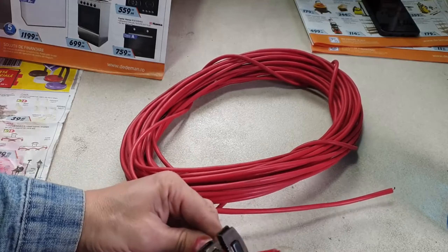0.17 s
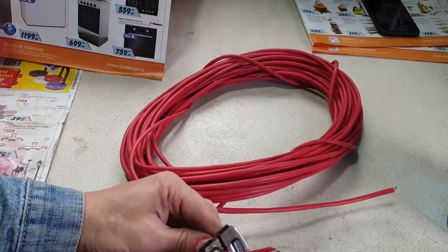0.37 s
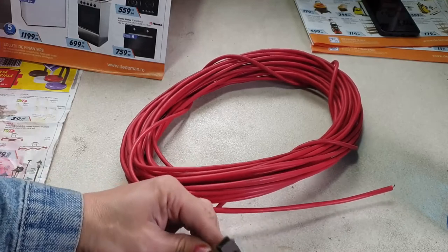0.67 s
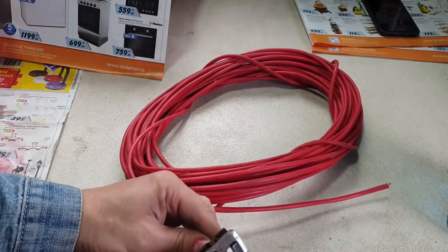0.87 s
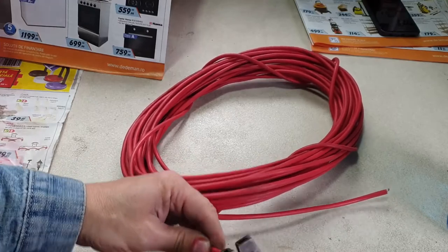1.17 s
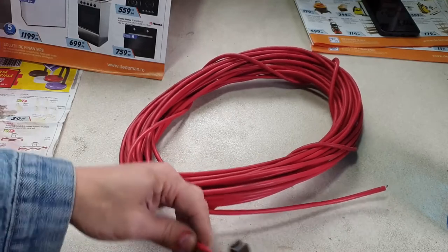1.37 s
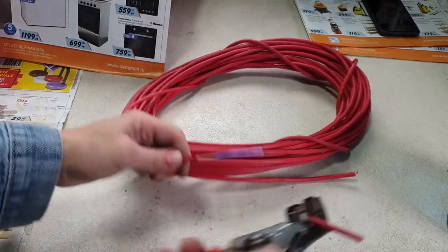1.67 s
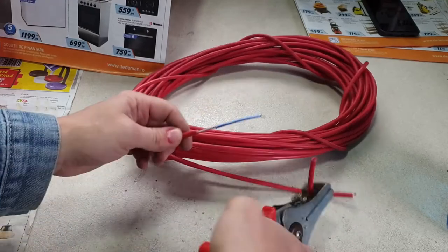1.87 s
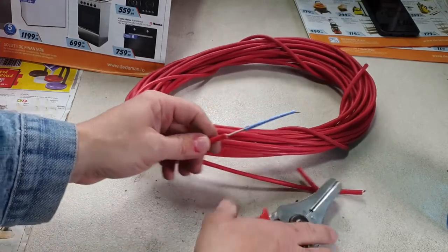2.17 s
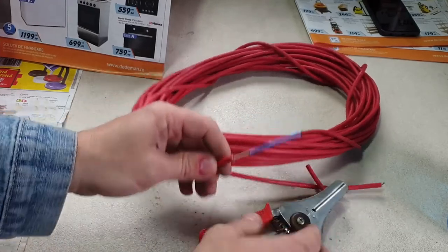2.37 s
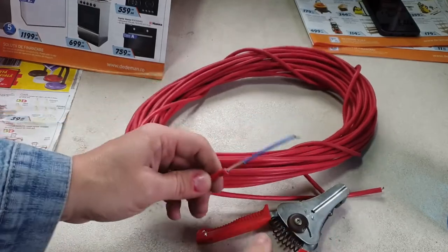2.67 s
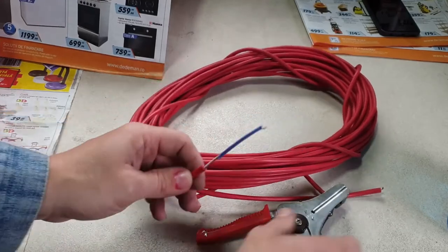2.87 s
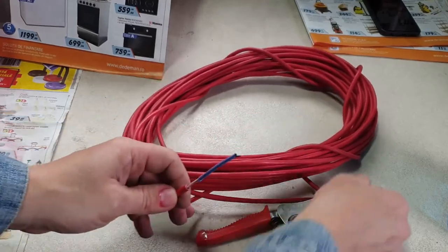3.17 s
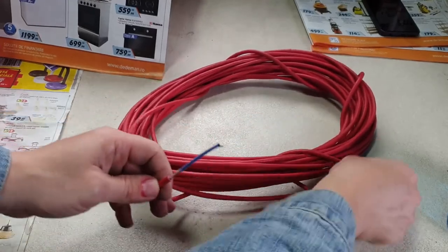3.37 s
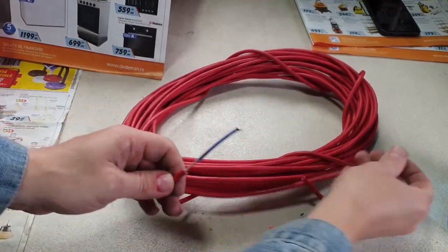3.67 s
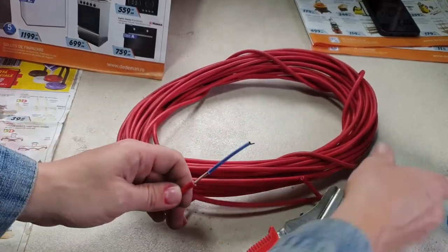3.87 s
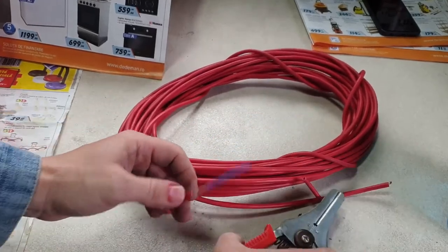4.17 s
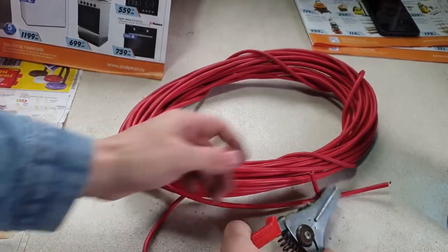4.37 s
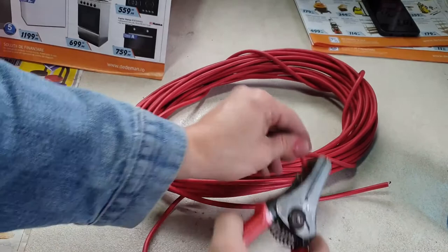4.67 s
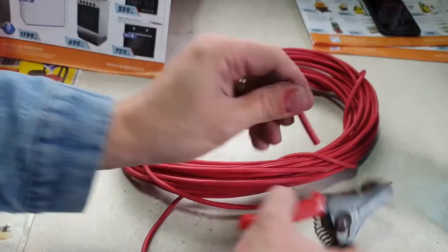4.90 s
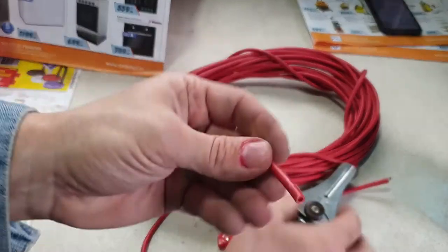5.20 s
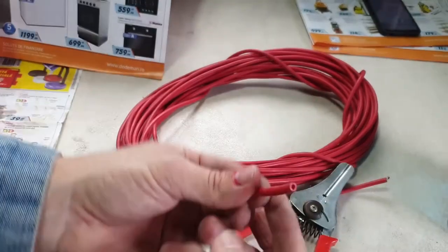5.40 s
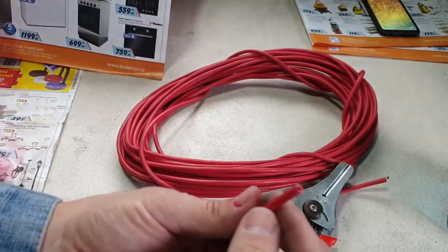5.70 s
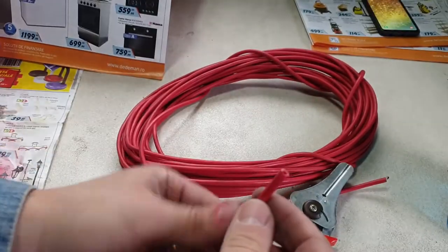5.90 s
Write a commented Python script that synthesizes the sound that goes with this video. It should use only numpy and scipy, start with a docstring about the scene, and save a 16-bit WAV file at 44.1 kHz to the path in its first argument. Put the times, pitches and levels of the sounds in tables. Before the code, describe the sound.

A hand wire stripper clicks and snaps the sheath off a cable, its spring pinging open, then it scrapes and drops onto a workbench.

```python
"""Small room, stereo microphone close to a workbench; rumble and hiss (shaped noise) lie under it all.
First, hands rub (grainy noise), a wire stripper's spring jingles (resonated noise), low jolts thump (sine swings).
Jaws bite and snap the sheath off at 1.2 s, the spring throws them open at 2.05 s: bursts, ringing steel, room tail.
The tool knocks and drags on the bench (droning noise); at 3.5 s a sleeve buffets the left port (low noise).
A few clicks as the tool is lifted, and at 5.2 s it drops back on the bench (bursts and ringing bench top)."""
import sys
import numpy as np
from scipy import signal
from scipy.fft import rfft, irfft, next_fast_len
from scipy.io import wavfile
from scipy.ndimage import uniform_filter1d

SR = 44100
rng = np.random.default_rng(int(sys.argv[2]) if len(sys.argv) > 2 else 0)


def materialize(psi):
    """Save the field psi as 16-bit PCM at rate SR to the path in sys.argv[1].

    A 1-D psi becomes a single channel; in a 2-D psi each row is a channel.
    """
    bounded = np.clip(np.atleast_2d(psi).T, -1, 1)
    quanta = np.round(bounded * 32767).astype(np.int16)
    wavfile.write(sys.argv[1], SR, quanta)


N = 266496
TIME = np.arange(N) / SR


def from_db(db):
    """Decibels to gain."""
    return 10 ** (np.asarray(db) / 20)


def rms_one(x):
    """Scale to unit rms."""
    return x / np.sqrt(np.mean(x ** 2) + 1e-20)


def at_hz(points, hz):
    """Read a table along log frequency."""
    table_hz, value = np.transpose(points)
    return np.interp(np.log(np.maximum(hz, 1)), np.log(table_hz), value)


def pan(left_over_right_db):
    """Left and right gains of constant power."""
    return rms_one(from_db([[left_over_right_db / 2], [-left_over_right_db / 2]]))


# how alike diffuse sound is at the two ports: frequency_hz, correlation
PORT_LIKENESS = [(60, 1), (400, 0.62), (1000, 0.062), (2000, 0.033), (5000, 0.28), (15000, 0.029)]


def stereo_noise(size):
    """Diffuse sound: alike at both ports in the bass, nearly unrelated in the high treble."""
    alike = np.clip(at_hz(PORT_LIKENESS, np.fft.rfftfreq(size, 1 / SR)), 0, .99)
    mid, side = rfft(rng.standard_normal((2, size)))
    spectrum = np.sqrt(1 + alike) * mid + np.sqrt(1 - alike) * side * [[1], [-1]]
    return irfft(spectrum, size)


def coloured(x, colour):
    """Shape a steady sound, falling away outside the table; rms 1."""
    hz = np.fft.rfftfreq(N, 1 / SR) + 1
    low_skirt = 1 + (colour[0][0] / hz) ** 6
    high_skirt = 1 + (hz / colour[-1][0]) ** 8
    shape = from_db(at_hz(colour, hz)) / np.sqrt(low_skirt * high_skirt)
    return rms_one(irfft(rfft(x) * shape, N))


def flutter(rate, depth_db):
    """A gain that wanders at random, with rate new values a second."""
    knots = rng.standard_normal(N // 20)
    return from_db(depth_db * np.interp(TIME * rate, np.arange(len(knots)), knots))


def resonate(x, modes):
    """Parallel resonances, each with its own peak gain."""
    out = 0
    for hz, width_hz, db in modes:
        r = np.exp(-np.pi * width_hz / SR)
        feed = np.array([1, 0, -1]) * (1 - r * r) / 2
        feedback = [1, -2 * r * np.cos(2 * np.pi * hz / SR), r * r]
        out = out + from_db(db) * signal.lfilter(feed, feedback, x)
    return out


def stroke(start, hold, db, attack, release):
    """Gain of one movement: it swells, holds and fades; attack and release are the times for 20 dB."""
    before = np.maximum(start - TIME, 0) / attack
    after = np.maximum(TIME - start - hold, 0) / release
    return from_db(db - 20 * np.minimum(before + after, 10))


def strokes(rows):
    """Gain of a series of movements; the strongest leads."""
    return np.max([stroke(*row) for row in rows], axis=0)


# edges of the bands in which a contact is built: frequency_hz
BAND_EDGES_HZ = [80, 260, 620, 1250, 3200, 7000, 11000, 16500]
BASS_LOSS_DB = 11.5   # small bodies radiate little in the lowest band


def contact_levels(db, corner_hz, rise_db, fall_db):
    """Level in each band: it rises to a corner and falls beyond; slopes in dB per octave."""
    edges = np.log2(np.array(BAND_EDGES_HZ) / corner_hz)
    octaves = (edges[:-1] + edges[1:]) / 2
    levels = db + rise_db * np.minimum(octaves, 0) - fall_db * np.maximum(octaves, 0)
    levels[0] -= BASS_LOSS_DB
    return levels


# time for the room tail to die by 60 dB: frequency_hz, decay_s
ROOM_DECAY = [(150, 0.34), (400, 0.33), (1000, 0.24), (2800, 0.24), (5000, 0.27), (8000, 0.24),
              (14000, 0.22)]


def blow(levels_db, treble_pan_db, contact_ms, room_db, modes, ring_db, gap_s, lag):
    """One contact: a noise burst, the ring of the body, and a room tail that dies band by band."""
    t = TIME[:next_fast_len(SR // 3 + SR // 20)]
    build_up = 1 - np.exp(-(t / gap_s) ** 2)
    first_impact = rms_one(1.0 * (t == 0))
    ring = from_db(ring_db) * build_up * resonate(first_impact, modes)
    out = 0
    for low, high, level_db in zip(BAND_EDGES_HZ, BAND_EDGES_HZ[1:], levels_db):
        hz = np.sqrt(low * high)
        burst = rms_one(rng.standard_normal(len(t)) * np.exp(-1000 * t / contact_ms)) + ring
        late_burst = np.pad(burst, (lag, 0))[:len(t)]   # the right port hears it lag samples later
        direct = np.array([burst, late_burst])
        tail = rms_one(stereo_noise(len(t)) * build_up * from_db(-60 * t / at_hz(ROOM_DECAY, hz)))
        room = from_db(room_db) * (tail + from_db(ring_db) * resonate(tail, modes))
        shade_db = treble_pan_db * min(hz / 11000, 1) ** 2   # the housing shades the right port from treble
        sound = (direct * pan(1.8 * shade_db) + room * pan(.4 * shade_db)) * pan(2.5)
        band = signal.butter(4, [low, high], "band", fs=SR, output="sos")
        sound = rms_one(signal.sosfilt(band, sound))
        out = out + from_db(level_db) * sound * np.sqrt(.01 / t[-1])   # level = energy spread over 10 ms
    return out


def blows(rows, modes, fall_db, ring_db, gap_s, lag):
    """Every contact of one body, laid out in time."""
    out = np.zeros((2, N + SR))
    for s, db, corner_hz, rise_db, contact_ms, room_db, treble_pan_db in rows:
        levels_db = contact_levels(db, corner_hz, rise_db, fall_db)
        sound = blow(levels_db, treble_pan_db, contact_ms, room_db, modes, ring_db, gap_s, lag)
        start = round(s * SR)
        out[:, start:start + sound.shape[1]] += sound
    return out[:, :N]


# reference level of the background: time_s, level_db
AIR_LEVEL = [(0,-54), (.3,-61), (1.04,-60), (1.35,-62.5), (1.8,-58.5), (2.2,-61), (3.03,-60), (3.08,-53.5),
             (3.45,-52.5), (3.72,-45), (5.1,-48.5), (5.8,-53), (6.04,-47)]
# spectra of rumble and hiss: frequency_hz, density_db (per Hz, relative)
RUMBLE_SPECTRUM = [(35, 0.5), (50, 0), (70, 3), (125, -8), (160, -8), (260, -14.5), (400, -16.5)]
HISS_SPECTRUM = [(150, -3), (330, 3), (600, -1), (1300, -2), (1650, 0), (2000, 3.5), (2650, 1.5),
                 (3300, -8.5), (4500, -14), (8000, -17)]
RUMBLE_DB, HISS_DB = 6, 6.5   # relative to the reference level


def background():
    """Low room rumble and a soft mid-range hiss, shaped from noise, which swell together."""
    rumble = from_db(RUMBLE_DB) * coloured(stereo_noise(N), RUMBLE_SPECTRUM) * pan(4.3)
    hiss = from_db(HISS_DB) * coloured(stereo_noise(N), HISS_SPECTRUM) * pan(2.4)
    times_s, levels_db = np.transpose(AIR_LEVEL)
    return from_db(np.interp(TIME, times_s, levels_db)) * (rumble + hiss)


# sheath, fingers and denim rub: start_s, hold_s, level_db, attack_s, release_s
RUB_STROKES = [(0, 0.022, -44, .05, 0.084), (1.13, .02, -58, 0.16, .2), (1.52, 0.14, -56.5, .14, .4),
               (1.72, .07, -53.5, 0.37, 0.38), (3.08, 2.4, -54.5, 0.12, 0.33),
               (3.61, 0.018, -40, 0.29, 0.15), (4.18, .1, -50, 0.12, 0.11), (6.02, .02, -54.5, 0.32, .2)]
# spectrum of the rubbing: frequency_hz, density_db (per Hz, relative)
RUB_SPECTRUM = [(1500, 4), (3500, -1), (6000, -4), (9000, -2.5), (11500, -1.5), (15500, -5)]
RUB_REST_DB = -68.5   # the hands are never quite still


def rubbing():
    """Plastic and cloth rub in fine grains: noise with a fast flutter, left of centre."""
    grains = stereo_noise(N) * flutter(rate=600, depth_db=1.0)
    level = np.hypot(strokes(RUB_STROKES), from_db(RUB_REST_DB))
    return level * coloured(grains, RUB_SPECTRUM) * pan(13.3)


# the spring jingles as the tool is first gripped: start_s, hold_s, level_db, attack_s, release_s
JINGLE_STROKES = [(.06, .04, -47.5, 0.17, 0.084)]
# resonances of the jingle: frequency_hz, width_hz, gain_db
JINGLE_RESONANCES = [(370, 160, 3), (1770, 90, 3), (4120, 150, -6), (5440, 160, -5), (6300, 300, -11),
                     (8400, 400, -12), (10600, 300, -12), (12300, 200, -13), (14600, 200, -14)]


def spring_jingle():
    """Fluttering noise keeps the resonances of the spring going, well to the left."""
    jingle = resonate(stereo_noise(N) * flutter(rate=207, depth_db=2), JINGLE_RESONANCES)
    return strokes(JINGLE_STROKES) * rms_one(jingle) * pan(19)


# soft jolts of the hands and cable: start_s, level_db, pitch_hz, length_s, left_over_right_db
JOLTS = [(0.36,-43,74.6,0.042,6), (0.966,-39,132,0.042,10), (1.171,-13,55,0.023,36),
         (1.172,-29,174,0.016,26), (1.522,-23.5,76.5,0.017,37), (2.2,-35,50,0.11,2),
         (3.172,-28,69.6,0.016,24), (3.781,-8.5,87,0.035,38), (5.171,-14.5,79,0.019,4.5),
         (5.194,-25,51,0.16,6)]


def thumps():
    """Each jolt swings the pressure slowly: a low sine that rises fast and fades."""
    out = 0
    for s, db, hz, length, side_db in JOLTS:
        age = np.clip((TIME - s) / length, 0, 1)
        swing = np.sin(np.pi * np.sqrt(age)) * np.sin(2 * np.pi * hz * (TIME - s))
        out = out + from_db(db) * pan(side_db) / np.sqrt(2) * swing
    return out


# steel jaws, spring and handles: start_s, level_db, corner_hz, rise_db (per octave up to the corner),
# contact_ms, room_db, treble_pan_db (left over right, before the weights for direct sound and room)
STEEL_CLICKS = [(0.646,-46,16000,15,0.4,-6,40), (0.6655,-57.5,11900,-2.5,2.1,-5,32),
                (0.9718,-33,13200,3.5,3.3,-2,13), (1.1172,-41,9000,4,0.81,-3,7),
                (1.1448,-39.5,13000,6,2.5,6,11), (1.4088,-56.5,12000,5,0.7,-10,8),
                (2.1885,-46,12500,-1.5,4,-0.5,4), (2.5707,-63,9000,-2,0.86,-13,12),
                (3.1593,-43.5,7660,4.5,1.8,-10,23), (3.5928,-37,13500,3,0.78,-9,5),
                (3.9048,-29.5,6900,2.8,7.7,1.5,10), (3.9879,-44,7500,3,1.1,-1,11),
                (4.3122,-24.5,9800,3.3,1.1,0,15), (4.7118,-46.5,10000,3,6,3,13),
                (4.7806,-34.5,9500,3,1.6,-10.5,11), (4.9078,-43.5,12000,4.5,2.6,-6,2),
                (5.152,-38.5,7700,1,7.6,3,6), (5.1965,-23.5,4030,12,14,-2,7), (5.2098,-22,5040,16,10,0.5,1)]
# resonances of the steel: frequency_hz, width_hz, gain_db
STEEL_RESONANCES = [(2700, 200, -4), (5480, 60, -1), (5830, 500, 2), (8410, 200, -6), (11150, 250, -4),
                    (12116, 18, 6), (12510, 24, 6), (12980, 30, 0), (14600, 100, -7), (15552, 25, 5)]
PORT_LAG = 14   # samples between the ports


def steel_clicks():
    """Small hard parts touch: short bursts that set the steel ringing."""
    return blows(STEEL_CLICKS, STEEL_RESONANCES, fall_db=13.0, ring_db=-2.0, gap_s=0.00069, lag=PORT_LAG)


# tool and hand meet the bench: columns as for STEEL_CLICKS
BENCH_KNOCKS = [(0.6655,-40,304,6,1.2,-18,10), (2.181,-25,4100,-1,11,-3.5,3),
                (2.1875,-24.5,1450,-0.2,9.1,0,3), (3.532,-17.5,778,2,3.9,-9.5,11),
                (3.608,-23.5,800,-0.5,17,-29,9), (3.637,-18.5,610,1,37,-2.5,9),
                (4.168,-32.5,2830,-1,24,1,7), (4.189,-26.5,600,-1,9,-3.5,7), (5.152,-24,400,-8.5,18,0.5,6),
                (5.1957,-12,1650,2.6,3.3,0.5,2), (5.2098,-13.5,1470,0.8,7.5,-7,2),
                (5.244,-16.5,1090,19,20,-9,2), (5.267,-21.5,1110,10,10,-7,2)]
# resonances of the bench top: frequency_hz, width_hz, gain_db
BENCH_RESONANCES = [(242, 14, -10), (305, 30, -1), (365, 60, 5), (505, 22, 2), (746, 22, 0), (803, 20, 3),
                    (857, 18, 0), (950, 55, 2), (1050, 50, 0), (1202, 22, -2), (1350, 120, 0),
                    (1660, 260, 5), (1920, 40, 7), (2695, 25, -5), (3950, 200, -4), (5490, 80, -6)]


def bench_knocks():
    """Knocks make the bench top ring; so wide, it reaches both ports almost at once."""
    return blows(BENCH_KNOCKS, BENCH_RESONANCES, fall_db=12.5, ring_db=3, gap_s=0.0023, lag=PORT_LAG // 3)


# tool and cable slide on the bench: start_s, hold_s, level_db
DRAG_SLIDES = [(0.715, 0.29, -56), (2.514, 0.063, -48.5), (2.682, 0.01, -48), (3.365, 0.2, -41.5),
               (3.57, .125, -27), (3.849, 0.0154, -36), (4.195, 0.017, -39), (4.261, 0.052, -29.5)]
# spectrum of the sliding: frequency_hz, density_db (per Hz, relative)
DRAG_SPECTRUM = [(71, -29), (120, -9), (224, -2), (348, -3.5), (437, -11), (870, -13), (928, -17),
                 (991, -21.5), (1940, -34), (6000, -35.5), (7800, -72), (13200, -120)]
DRAG_ATTACK_S, DRAG_RELEASE_S = 0.065, .06


def drag():
    """Tool and cable stick and slip: fluttering noise, plus the drone it draws from the bench top."""
    slips = stereo_noise(N) * flutter(rate=120, depth_db=0.5)
    drone = coloured(slips + from_db(-3.0) * resonate(slips, BENCH_RESONANCES), DRAG_SPECTRUM)
    slides = [(*slide, DRAG_ATTACK_S, DRAG_RELEASE_S) for slide in DRAG_SLIDES]
    return strokes(slides) * drone * pan(4.6)


# the sheath tears free, the jaws slam open: columns as for STEEL_CLICKS
SHEATH_SNAP = [(1.1708,-27,15140,2.14,1.2,-0.5,8), (1.1755,-14.5,13000,7.2,26,8,6)]


def sheath_snap():
    """Tear and slam strike the steel, which rings."""
    return blows(SHEATH_SNAP, STEEL_RESONANCES, fall_db=13, ring_db=-1.5, gap_s=0.0016, lag=PORT_LAG)


# the handles let go and the spring throws the jaws open: columns as for STEEL_CLICKS
SPRING_RELEASE = [(2.0497,-31,11900,-0.078,4.3,-6,16), (2.052,-33.5,4340,-0.44,3.9,-1.5,8)]
# resonances of the spring and open jaws: frequency_hz, width_hz, gain_db
SPRING_RESONANCES = [(380, 90, 3), (1540, 250, 2), (1720, 150, 0), (1920, 40, 1), (3650, 300, 7),
                     (4000, 150, 8), (8500, 900, -7), (11000, 600, -7)]


def spring_release():
    """The freed spring and open jaws ring strongly after two quick blows."""
    return blows(SPRING_RELEASE, SPRING_RESONANCES, fall_db=23, ring_db=8.5, gap_s=0.0007, lag=PORT_LAG)


# the sleeve pushes air over the left port, then a weak wake: start_s, hold_s, level_db, attack_s, release_s
GUST_PUFFS = [(3.485, 0.0075, -13, 0.1, .09), (3.59, 0.01, -5.5, 0.12, 0.099),
              (3.638, 0.0087, -1.5, 0.073, 0.092), (3.8, 0.12, -25.5, .15, 0.063)]
# spectrum of the eddies: frequency_hz, density_db (per Hz, relative)
GUST_SPECTRUM = [(42, 4), (55, 1.5), (110, -1), (150, -5.5), (173, 1), (205, -11.5), (310, -12),
                 (500, -18.5), (1000, -35), (3000, -80), (13000, -70)]
GUST_ARRIVES_S, GUST_FRONT_S = 3.422, 0.03   # the front has fully arrived; how long it takes to rise


def sleeve_gust():
    """Eddies buffet the left port and barely reach the right; the fine ones need a fast flow."""
    eddies = coloured(rng.standard_normal((2, N)), GUST_SPECTRUM)
    # even out the eddies, so that the flow alone sets their strength
    eddies = eddies / np.sqrt(uniform_filter1d(eddies ** 2, size=2600) + 1e-9)
    coarse = signal.sosfiltfilt(signal.butter(2, 200, fs=SR, output="sos"), eddies)
    fine = eddies - coarse
    front = np.clip(1 + (TIME - GUST_ARRIVES_S) / GUST_FRONT_S, 0, 1)
    flow = strokes(GUST_PUFFS) * front
    return flow * (coarse + fine * (flow / flow.max()) ** 0.5) * from_db([[0], [-33]])


def scene():
    """Room, hands, tool and bench, added together."""
    hands = rubbing() + spring_jingle() + thumps()
    contacts = steel_clicks() + bench_knocks() + sheath_snap() + spring_release()
    return background() + hands + contacts + drag() + sleeve_gust()


CUTOFF_HZ = 15750


def record(dry):
    """The microphone sheds the deepest bass, overload flattens the peaks, the top is cut."""
    bass_cut = signal.butter(2, 30, "high", fs=SR, output="sos")
    flattened = np.clip(signal.sosfilt(bass_cut, dry), -.98, .98)
    top_cut = signal.ellip(10, .05, 70, CUTOFF_HZ, fs=SR, output="sos")
    return signal.sosfiltfilt(top_cut, flattened)


dry = scene()
out = record(dry)
materialize(out)
```